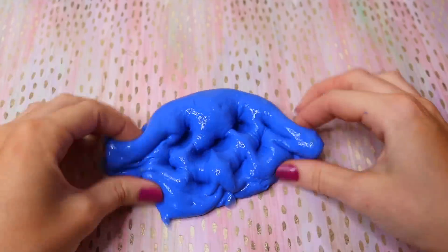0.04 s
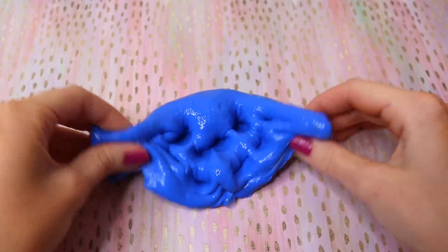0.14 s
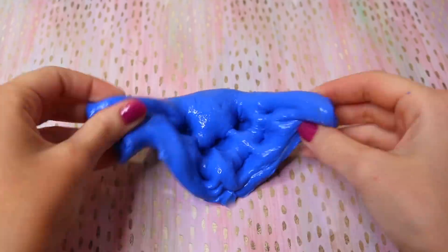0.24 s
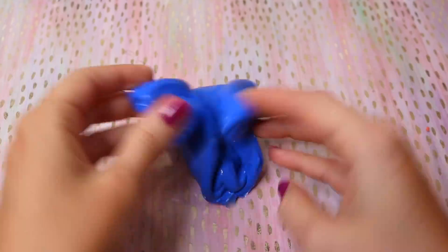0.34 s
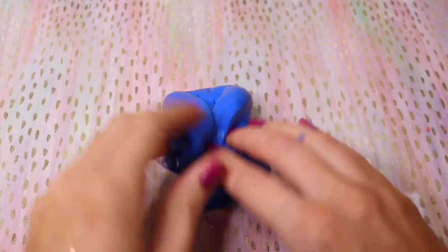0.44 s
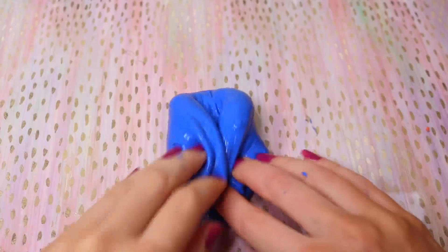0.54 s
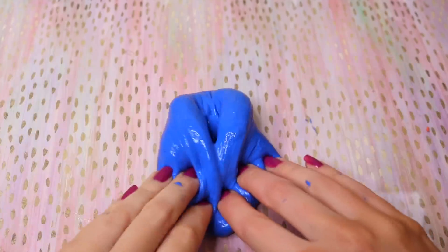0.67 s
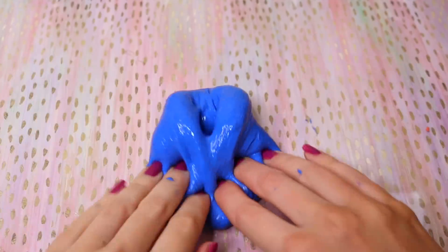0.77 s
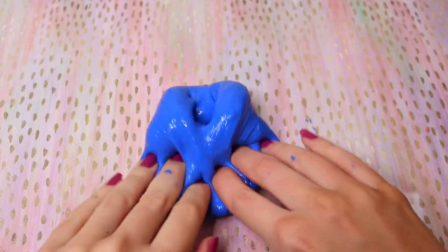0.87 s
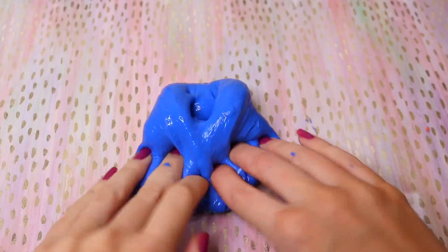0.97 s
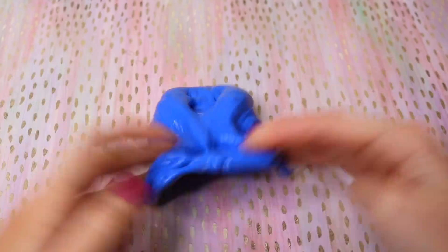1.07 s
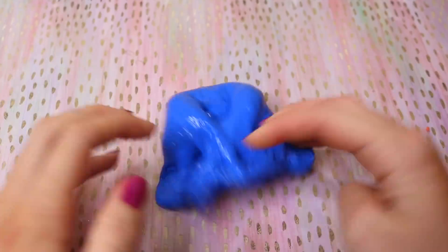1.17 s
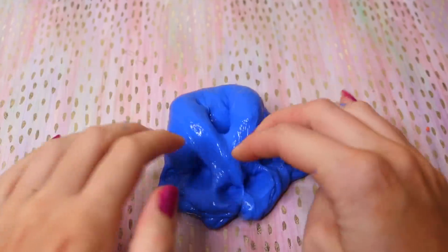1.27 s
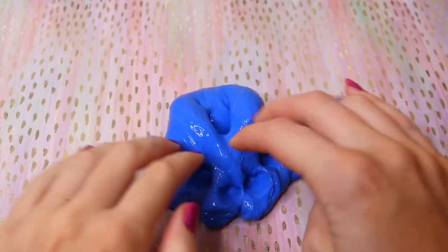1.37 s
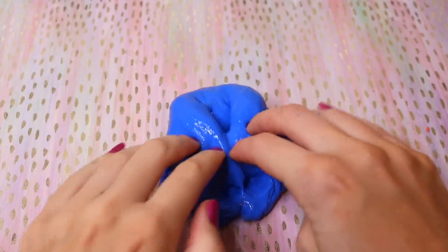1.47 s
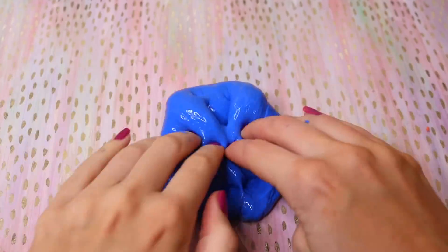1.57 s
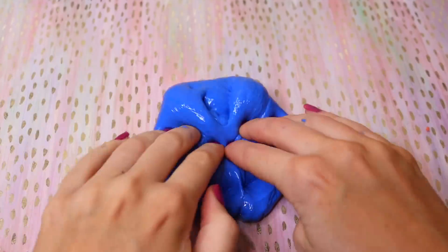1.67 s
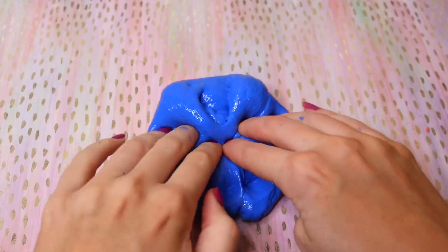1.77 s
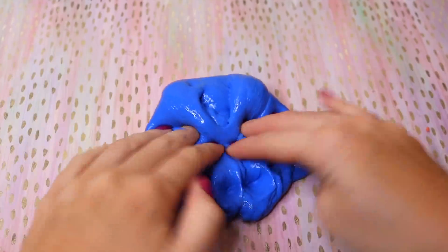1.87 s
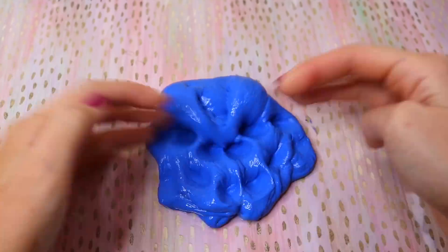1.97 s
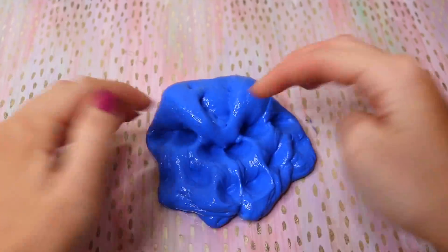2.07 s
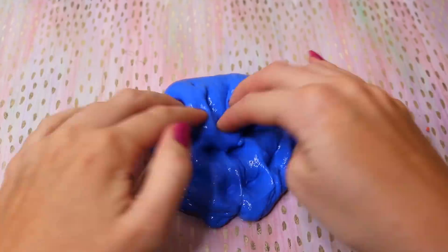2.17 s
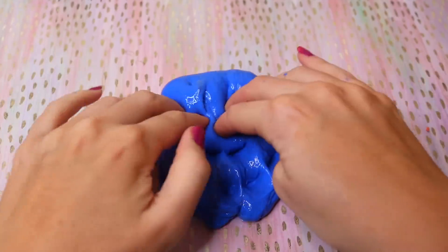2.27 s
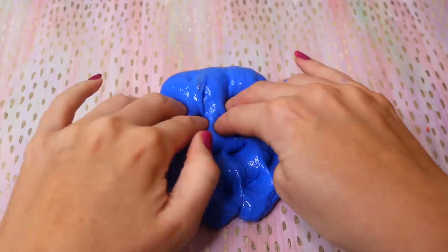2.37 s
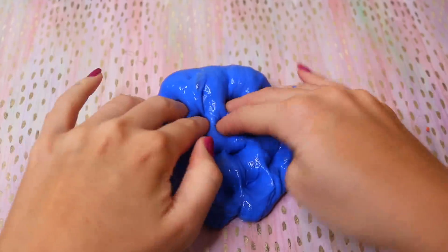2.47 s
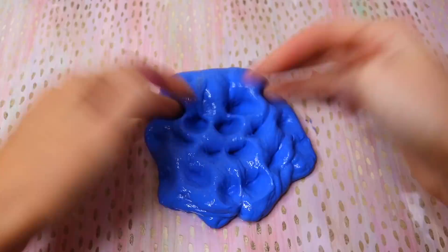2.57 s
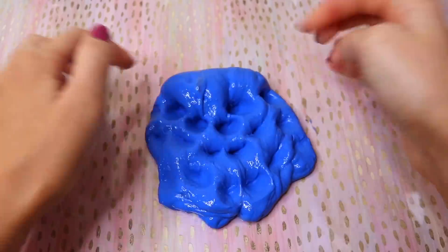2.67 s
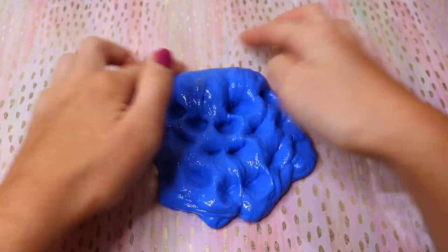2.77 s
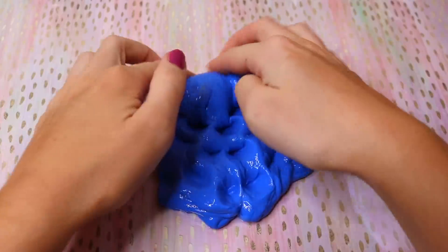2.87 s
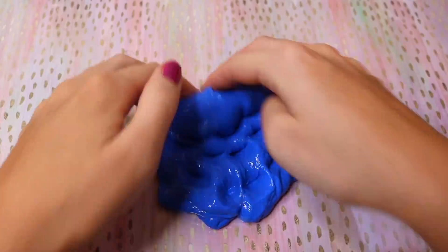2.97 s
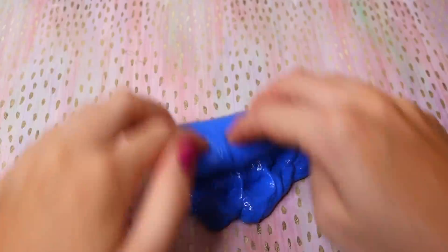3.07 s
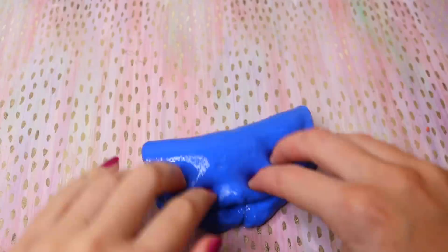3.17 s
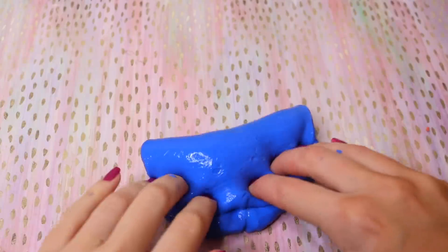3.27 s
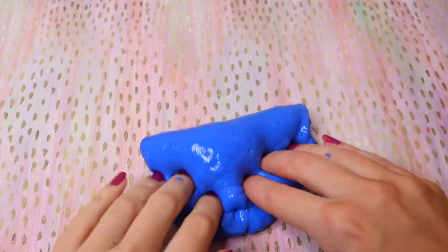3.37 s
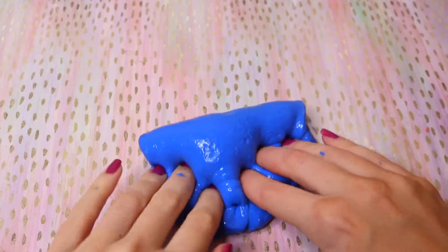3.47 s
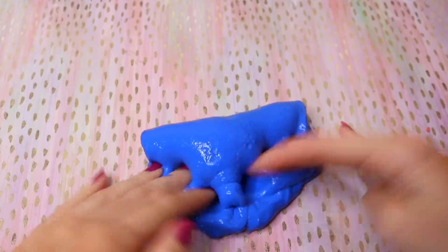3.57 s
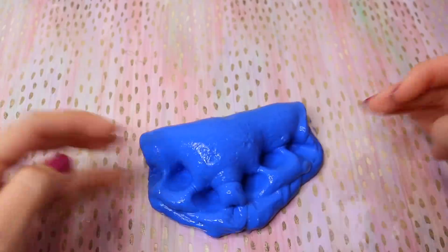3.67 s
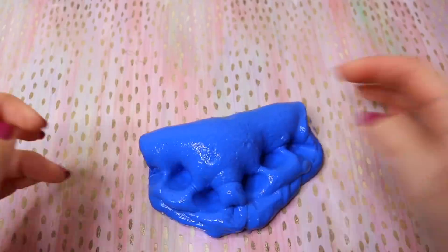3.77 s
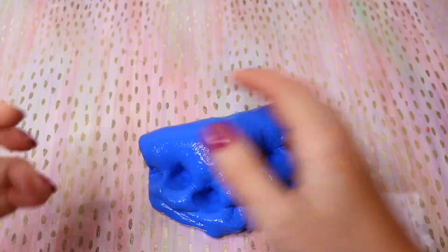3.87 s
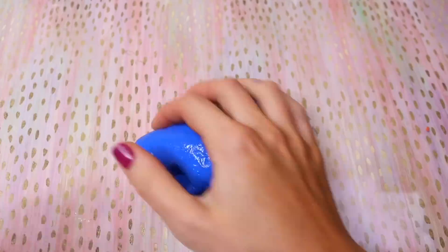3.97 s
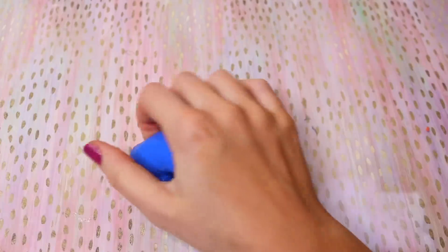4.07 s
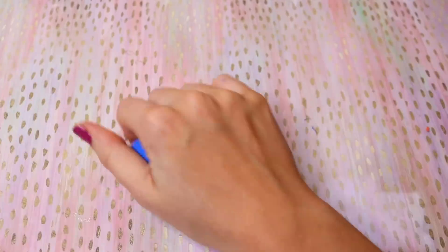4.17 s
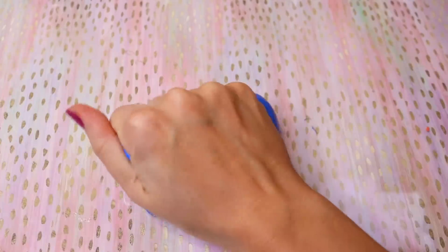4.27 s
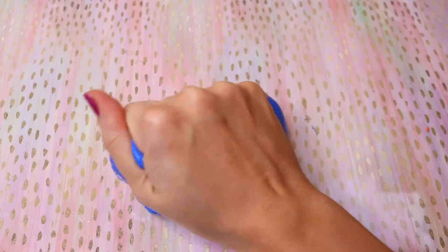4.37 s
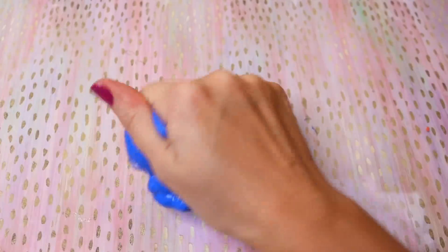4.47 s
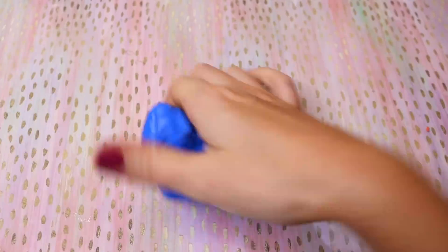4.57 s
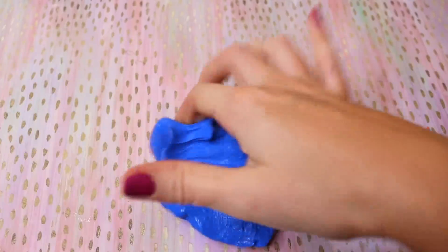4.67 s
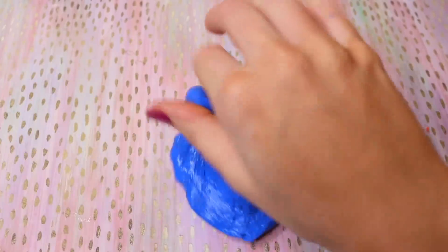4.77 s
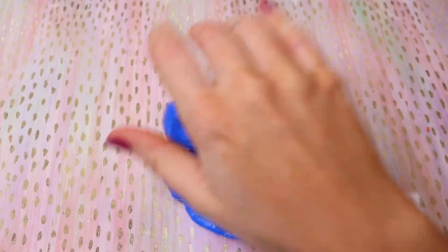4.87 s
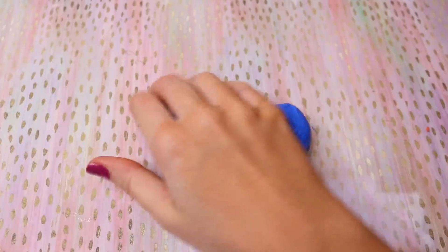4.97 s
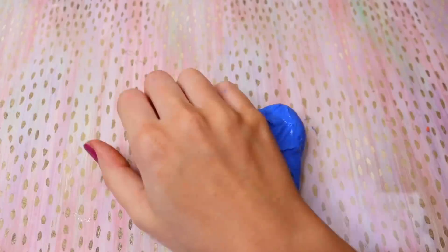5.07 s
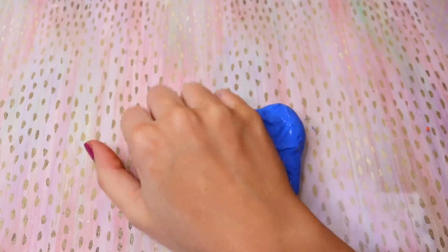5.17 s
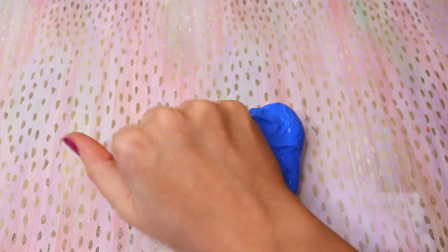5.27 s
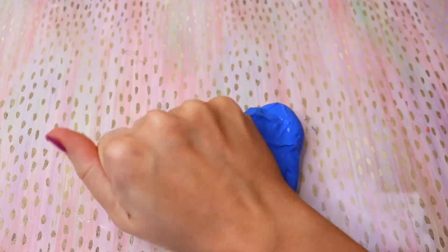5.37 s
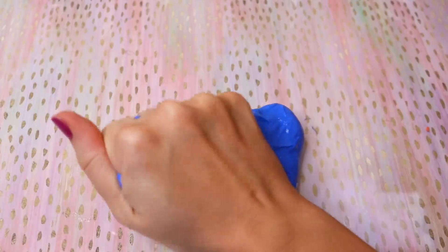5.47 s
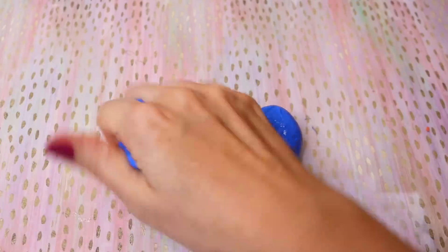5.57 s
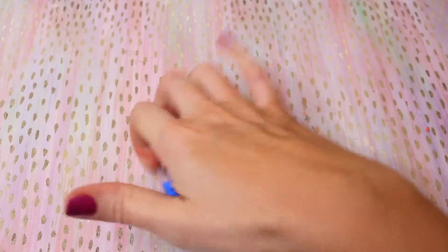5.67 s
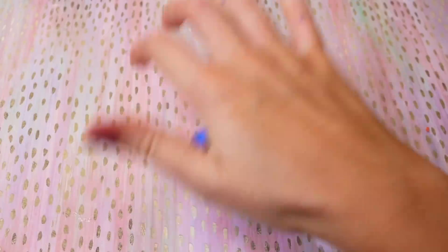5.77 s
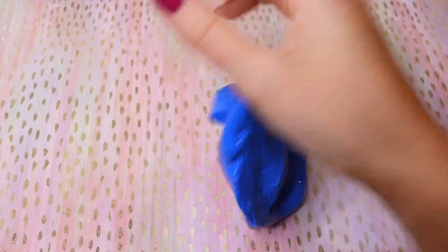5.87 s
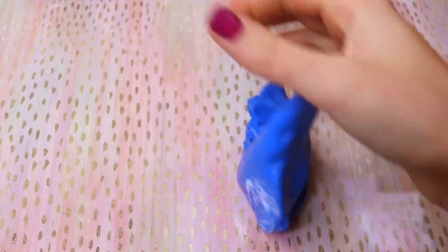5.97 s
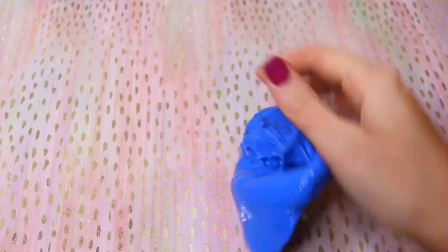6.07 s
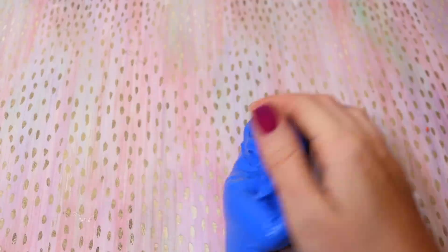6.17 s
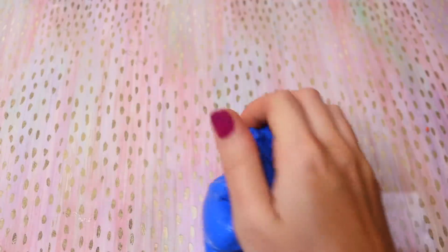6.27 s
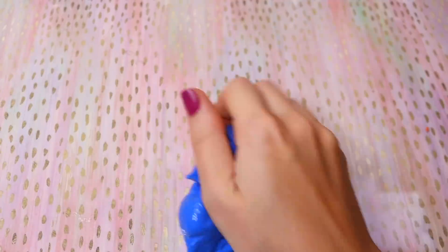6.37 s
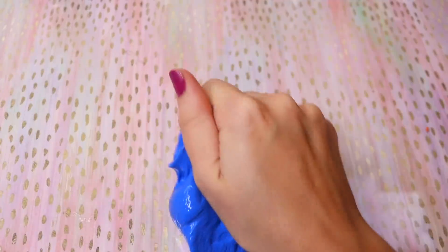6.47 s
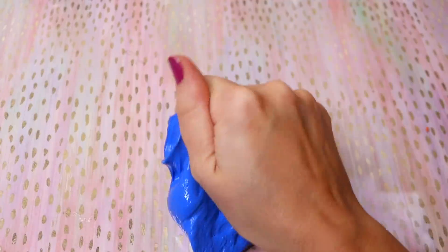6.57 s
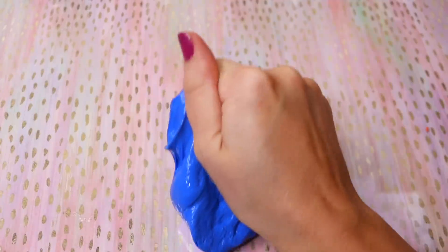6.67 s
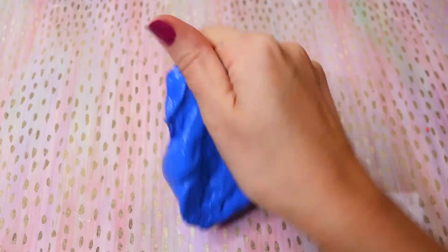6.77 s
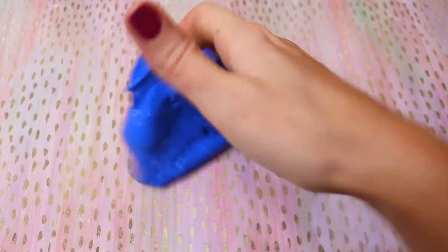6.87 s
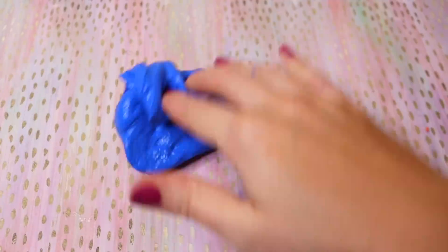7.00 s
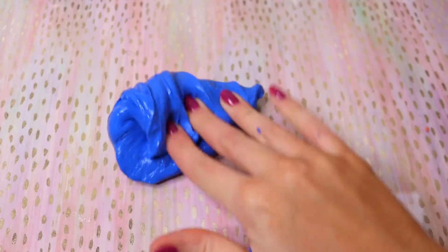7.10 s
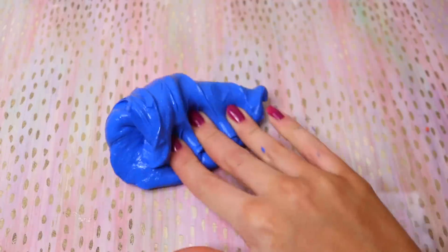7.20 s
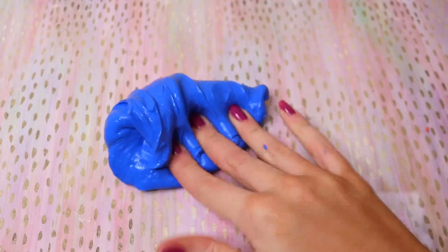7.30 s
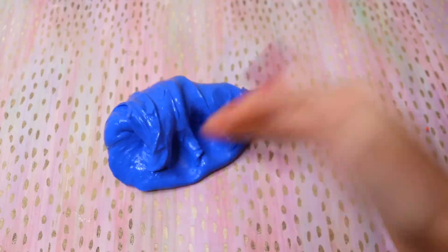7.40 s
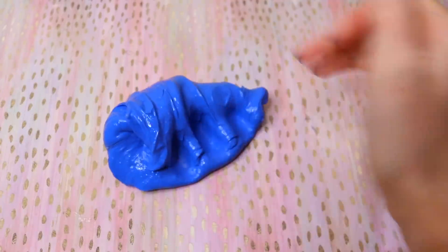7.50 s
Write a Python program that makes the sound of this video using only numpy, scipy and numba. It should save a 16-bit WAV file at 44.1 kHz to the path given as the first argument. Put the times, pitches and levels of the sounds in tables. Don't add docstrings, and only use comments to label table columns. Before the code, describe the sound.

Hands poke, fold and squeeze wet slime very close up, air pockets bursting in sharp irregular snaps with hollow plops and dull table knocks.

```python
import sys
import numpy as np
from scipy import signal
from scipy.fft import rfft, irfft
from scipy.io import wavfile
from scipy.ndimage import uniform_filter1d
from numba import njit

SR = 44100
rng = np.random.default_rng(int(sys.argv[2]) if len(sys.argv) > 2 else 0)


def materialize(psi):
    bounded = np.clip(np.atleast_2d(psi).T, -1, 1)
    quanta = np.round(bounded * 32767).astype(np.int16)
    wavfile.write(sys.argv[1], SR, quanta)


def voltage_ratio(level):
    return 10 ** (np.asarray(level, float) / 20)


N = 332514
t = np.arange(N) / SR


def band(x, hz, width_hz, order=1):
    edges_hz = np.clip([hz - width_hz / 2, hz + width_hz / 2], 15, .45 * SR)
    return signal.sosfilt(signal.butter(order, edges_hz, "band", fs=SR, output="sos"), x)


def peak(x, db):
    return x * voltage_ratio(db) / np.abs(x).max()


def unit(x):
    return x / np.sqrt(np.mean(x ** 2))


def add(out, start_s, x):
    i = int(start_s * SR)
    out[..., i:i + x.shape[-1]] += x[..., :N - i]


def decay(u, t60_s):
    return np.exp(-np.log(1000) * u / t60_s)


def walk(rate_hz):
    k = int(SR / rate_hz)
    steps = np.repeat(rng.standard_normal(N // k + 1), k)
    return 0.71 * uniform_filter1d(uniform_filter1d(steps, k), k)[:N]


@njit
def follow(x, attack, release):
    y, e = np.empty(len(x)), 0.
    for i in range(len(x)):
        e += (x[i] - e) * (attack if x[i] > e else release)
        y[i] = e
    return y


def hiss():
    # hz, density_db
    colour = [(15, -33), (25, -8), (70, -9), (123, -5), (141, -8), (175, -12), (242, -8.5), (734, -16.5),
              (1290, -17), (1700, -20.5), (3250, -25), (4870, -28.5), (9320, -25), (13600, -31),
              (16000, -36.5)]
    level_db = -53
    colour_hz, colour_db = np.transpose(colour)
    hz = np.fft.rfftfreq(N, 1 / SR) + 1
    shape = voltage_ratio(np.interp(np.log(hz), np.log(colour_hz), colour_db))
    mid, side = rfft(rng.standard_normal((2, N)))
    apart = np.clip(0.38 + hz / 1400, 0, 1)
    air = irfft(shape * (mid + apart * side * np.array([[1], [-1]])), N)
    return voltage_ratio(level_db + 0.27 * walk(2.6)) * unit(air)


def mains_hum():
    # hz, rms_db
    tones = [
        (60, -66),
        (115.82, -69.5),
        (120.09, -55.5),
        (240.2, -67),
    ]
    first_swell_s = 0.058
    hum = np.zeros(N)
    for hz, db in tones:
        level = voltage_ratio(db + 0.54 * walk(3.52)) * np.sqrt(2)
        hum += level * np.sin(2 * np.pi * hz * (t - first_swell_s))
    return hum


def pull(peak_s, swell_ms, fade_ms, db):
    before = (peak_s - t) * 1000 / max(swell_ms, 3)
    after = (t - peak_s) * 1000 / max(fade_ms, 3)
    return voltage_ratio(db - 10 * np.maximum(before, after) ** 2.15)


def peel():
    # peak_s, swell_ms (10 dB), fade_ms (10 dB), level_db, treble_db
    peels = [(0, 50, 75, -52, -8), (.12, 6, 63, -53, -9), (1.151, 59, 25, -45.5, -2.5),
             (2.87, 40, 174, -53.5, -8), (4.04, 73, 108, -53, -0.5), (4.3, 100, 30, -50, -7),
             (4.597, 50, 85, -39.5, -8), (5.1, 60, 8, -52, -13), (5.647, 66, 123, -46.5, -4.5),
             (6.862, 25, 25, -40, -0.5), (6.93, 36, 72, -52.5, 2), (7.457, 34, 12, -45.5, -6),
             (7.487, 5, 6, -48, -8)]
    sizes = voltage_ratio(1.8 * rng.exponential(size=N) + 6 * walk(200))
    grains = rng.standard_normal((3, N)) * sizes
    grains = grains[0] + 0.63 * grains[1:]
    dull, bright = np.zeros(N), np.zeros(N)
    for peak_s, swell_ms, fade_ms, db, treble_db in peels:
        tear = pull(peak_s, swell_ms, fade_ms, db)
        dull += tear
        bright += tear * voltage_ratio(treble_db)
    hollow = 0.88 * band(grains, 840, 200) + band(grains, 1540, 880) + 0.29 * band(grains, 3200, 1260)
    return dull * unit(hollow) + bright * unit(band(grains, 7130, 5300))


def leaks():
    # peak_s, swell_ms (10 dB), fade_ms (10 dB), level_db, slit_hz
    slits = [(.005, 10, 35, -53, 4530), (.11, 40, 48, -54, 1640), (5.106, 10, 14, -51, 7960),
             (5.525, 8, 128, -33.5, 9200), (6.662, 23, 40, -42, 870), (6.668, 22, 35, -43, 1450),
             (7.452, 22, 16, -50, 7500), (5.82, 40, 50, -60, 3200), (1.14, 25, 25, -50, 1250),
             (3.7, 30, 55, -47.5, 950), (6.655, 15, 40, -44, 4100), (2.92, 40, 60, -56, 1750),
             (3.79, 50, 60, -56, 650), (5.645, 40, 40, -52, 2000)]
    air = rng.standard_normal((3, N))
    air = (air[0] + 0.64 * air[1:]) * voltage_ratio(4.4 * walk(120))
    return sum(pull(*row) * unit(band(air, hz, 0.47 * hz, order=2)) for *row, hz in slits)


def table_top():
    # hz, level_db, t60_s
    modes = [
        (243, -7, .17),
        (278, -3, .2),
        (260, -5, .19),
        (391, -7, .11),
        (428, -10, .08),
        (540, -11, .12),
    ]
    # start_s, level_db, low_modes_db
    pushes = [(.052, -44.5, 7), (1.081, -33.5, 2), (1.14, -50, 2), (1.284, -31.5, 3.5), (1.955, -22.5, -5),
              (1.9845, -14.5, -6), (2.009, -31, -8), (2.03, -31, -8), (2.591, -17, -3), (2.617, -28, 4),
              (2.651, -21, 5), (2.873, -29.5, 5), (3.152, -46, 4), (3.351, -41, 1), (3.617, -29.5, -1.5),
              (3.647, -30, -1.5), (3.681, -26.5, -5), (4.07, -38.5, 7), (4.234, -33.5, 1),
              (4.298, -32, -1.5), (4.684, -36.5, -3), (5.047, -31.5, 6), (5.101, -50, -3), (5.155, -29, -1),
              (5.255, -26, 8), (6.178, -43.5, 7), (6.453, -35, 5.5), (7.423, -36.5, -4), (7.445, -33, 1),
              (1.974, -25, -10),
        (2.641, -25, 5),
        (4.227, -40, 0),
        (3.75, -44, -6),
    ]
    damped = .95
    hard_ms, softer_ms_per_db = 0.68, 0.07
    out, u = np.zeros(N), t[:14000]
    for start_s, level_db, low_db in pushes:
        ring = np.zeros(len(u))
        for hz, db, t60_s in modes:
            place_db = 2.1 * rng.standard_normal()
            gain = voltage_ratio(db + place_db + low_db * (hz < 300))
            ring += gain * np.sin(2 * np.pi * hz * u) * decay(u, t60_s * damped)
        blur = band(rng.standard_normal(len(u)), 450, 440, order=2)
        knock = .6 * unit(blur) * decay(u, .12)
        push_ms = max(hard_ms - softer_ms_per_db * level_db, .3)
        push = np.hanning(int(push_ms * SR / 1000) - 2)
        thump = band(signal.fftconvolve(ring + knock, push), 804, 927, order=2)
        add(out, start_s, peak(thump, level_db))
    return out


def film_rows():
    # start_s, level_db, low_treble_db, pan_db (left minus right), spatter_ms
    large = [(1.9568, 4, -6.5, -5.5, 0.61), (2.589, 3, -38, -3, 0.21), (2.5921, -11.5, 9.5, -3, 0.52),
             (2.6133, 7.5, -48, -2.5, 0.79), (3.154, -15, 3, -4, 1.1), (3.6195, 6.5, -14.5, -6, 0.93),
             (3.6452, -2.5, -30.5, 9, .67), (3.6475, 0.5, -9, -19.5, 0.94), (3.677, -4, -17, -2, 1.8),
             (4.2518, 0.5, -15, -2, 1.15), (4.3119, -4.5, -7, -4, 1.5), (4.3374, -3.5, -15, 3.5, 2.2),
             (4.357, -3, -33.5, -16.5, 0.62), (4.4367, 4.5, -13, -2.5, 1.1), (4.5674, -17, -14, -3, 2.5),
             (4.6079, -13, -8, -5.5, 1.2), (5.3524, -5, -8, -1.5, .9), (5.4535, -1, -8, -1, 0.68),
             (5.5122, 3, -16, -0.5, 2.2), (5.5194, -7, -43, -2, 2.7), (6.5853, -5, -15, -3, 1.4),
             (6.594, -0.5, -8, 0, 0.81), (6.6311, 6, -4, -4.5, 1.8), (6.6972, 4.5, -7, -2, 2.44)]
    # start_s, level_db, low_treble_db, pan_db
    trailers = [(1.9775, -27, 23.5, -7), (1.98, -24, 18.5, 3), (1.986, -27, 16, -3.5),
                (2.019, -17.5, -21, 8.5), (2.0236, -23, -13, -19.5), (2.0357, -40, 22, 1),
                (2.0445, -20, -9, -5), (2.6589, -15, -28, 9.5), (2.6642, -13, -37.5, -13),
                (2.6888, -19, -8, -5), (3.1859, -27.5, 2, -8.5), (3.192, -23, -31, -2.5),
                (3.6309, -18.5, -18, 6.5), (3.6812, -16, -10, 3), (4.26, -14, -17, -5),
                (4.2792, -24, -3, 5), (4.3446, -16, -21, 5.5), (4.4024, -24, -15, 8.5),
                (4.4084, -14, -14, -4), (4.4212, -16, -25, 0), (4.4423, -11.5, -23, 5),
                (4.4516, -21, -20, 2), (4.5905, -29, 0, -3), (4.682, -25, -10, -3), (5.3857, -23.5, -6, -2),
                (5.4605, -17, -20, 0), (5.5266, -16, -40, 11), (6.6185, -21, -5, -1.5),
                (6.6444, -5, -15, -3), (6.7664, -16, -12, -1)]
    # start_s, level_db, low_treble_db, pan_db
    ticks = [(.1578, -33, -22, 1), (.2592, -36, -5, -2), (.3063, -37, -22, -5), (.3578, -30.5, -12, -5),
             (.3808, -33, 16, -5.5), (.434, -23.5, -2, -4.5), (.5543, -31.5, -5, -6),
             (.6603, -34.5, -8, -2), (.848, -22, -15, -14), (1.0787, -26, -30, -3), (1.0908, -28.5, -4, -9),
             (1.1517, -27, -3, -6), (1.168, -23, -7.5, -6), (1.2724, -35.5, 3, -16),
             (1.285, -37, 14.5, -13), (1.5976, -28.5, -11, -5), (1.6343, -16.5, -31.5, -11),
             (2.366, -37, -2.5, -3), (3.3498, -14, -9.5, -11), (3.5636, -31.5, -12, 1),
             (3.9844, -34.5, -10, -12), (4.0357, -29.5, -7.5, -13), (4.2077, -30, 10, -3),
             (4.2313, -32, 4.5, -10), (5.0491, -28, -22, -1), (5.158, -20.5, -13, -2),
             (6.2518, -32, -4.5, -26), (6.5005, -25, -9, -4), (6.5355, -22.5, -11, -2),
             (6.8651, -21, 0.5, -3)]
    # start_s, level_db
    specks = [(.1274, -38), (.5745, -37), (0.722, -39), (1.183, -32), (1.968, -22), (2.3602, -38.5),
              (2.6269, -17), (3.6571, -31), (3.6917, -24), (4.236, -27.5), (4.2645, -25), (4.2959, -32),
              (4.361, -20.5), (4.7723, -33), (5.101, -31), (5.895, -37), (5.912, -37.5), (6.3703, -36.5),
              (6.428, -30), (6.8566, -22), (6.929, -29), (6.974, -31), (7.189, -33), (7.4605, -28)]
    # start_s, level_db, low_treble_db, pan_db
    crackles = [(1.731, -39, -4, -3), (2.0095, -27, -20, -3), (2.056, -28, -20, -3), (3.2235, -45, 6.5, -3),
                (3.6832, -15, -14, -6), (4.2535, -11, -12, -2), (4.4385, -11, -17, -2), (4.556, -36, 0, -3),
                (4.7, -34, -1, -3), (4.827, -40, 3, -3), (4.846, -41.5, 6, -3), (5.0693, -37, -3, -2),
                (5.1045, -32, -8, -5), (5.128, -35, -12, -2), (5.18, -36, -15, -2), (5.3505, -14, -3, 0),
                (5.433, -49, 12, -2), (6.629, -20, -5, -3), (6.6337, 2, -8, -8), (6.683, -16, -15, -3),
                (6.6993, -7, -5, -8), (6.709, -22, -6, -3), (6.7645, -24, -3, -4), (7.456, -33, -2, -3.5),
                (7.486, -43, 5, -9), (6.876, -29, -5, -3), (6.915, -33, -3, -3), (7.4605, -33, -2, -5),
                (7.444, -40, 5, -2), (5.5135, -6, -10, -2.5), (6.647, -17, -11, -3)]
    # start_s, ring_hz
    own_rings = [(1.6343, 8540), (2.0236, 8000), (2.6642, 7340), (3.154, 7400), (3.3498, 8300),
                 (3.677, 7200), (4.2077, 6500), (4.3374, 12200), (4.357, 11200), (4.5664, 7800),
                 (4.6079, 7550), (5.0491, 6700), (5.158, 7000), (5.5122, 9760), (5.5194, 9600),
                 (6.2518, 10500), (1.9568, 9000), (1.0787, 6800), (6.6311, 8500), (6.6444, 8300),
                 (6.7664, 11500), (6.8651, 7000)]
    trailer_ms, tick_ms = 1.67, 1.3
    base_hz, deep_from_db, sag_hz_per_db, sag_hz_per_ms = 8910, -9.5, 118, 1500
    palm_from_s, palm_hz = 4.22, 998

    specks = [(start_s, db, -6.5, -4.5) for start_s, db in specks]
    rows = list(large)
    for group, ms in [(trailers, trailer_ms), (ticks + specks, tick_ms), (crackles, tick_ms)]:
        for row in group:
            rows.append((*row, ms * voltage_ratio(-max(row[2], 0))))

    rings_hz = []
    for start_s, db, low_db, pan_db, ms in rows:
        hz = base_hz - sag_hz_per_db * max(low_db - deep_from_db, 0) - sag_hz_per_ms * max(ms - 2, 0)
        rings_hz.append(max(hz + palm_hz * (start_s > palm_from_s), 4000))
    for start_s, hz in own_rings:
        rings_hz[np.argmin([abs(row[0] - start_s) for row in rows])] = hz
    return [(start_s, db, hz, *rest) for (start_s, db, *rest), hz in zip(rows, rings_hz)]


def snaps():
    out, u = np.zeros((3, N)), t[:2400]
    for start_s, db, hz, low_db, pan_db, spatter_ms in film_rows():
        shared, left, right, size = rng.standard_normal((4, len(u)))
        spatter = .8 * (shared + np.array([left, right, 0 * u])) * voltage_ratio(4 * size)
        droplets = .165 * np.exp(-u * 1000 / max(spatter_ms, .2))
        fizz = .014 * np.exp(-u / .011)
        burst = spatter * (droplets + fizz) * [[1], [1], [0]]
        burst[:, 0] = [1, 1, 1 + 0.76 * spatter_ms]
        ring = band(burst, hz, 0.63 * hz, order=2)
        body = band(burst, 3600, 2500, order=2)
        edge = .3 * band(burst, 13500, 5000, order=2)
        snap = ring / np.abs(ring[:2]).max() + voltage_ratio(low_db) * body / np.abs(body[:2]).max() + edge
        snap[0] = np.roll(snap[0], int(1.6 * abs(size[0])))
        add(out, start_s, snap * voltage_ratio(db + np.array([[pan_db], [-pan_db], [0]]) / 2))
    return out


def hollows(rows, cycles, rough=.4, swell_cycles=.01):
    out, u = np.zeros((2, N)), t[:2600]
    for start_s, db, hz in rows:
        fade = decay(u, cycles / hz)
        swell = 1 - np.exp(-u * hz / swell_cycles)
        tone = np.sin(2 * np.pi * hz * (u + 3.3 * u ** 2)) * fade * swell
        noise = rng.standard_normal(len(u))
        wet = np.array([noise, .6 * noise + .8 * noise[::-1]])
        wet = unit(band(wet, .9 * hz, .8 * hz)) * fade ** .4
        add(out, start_s, peak(tone + rough * wet, db))
    return out * voltage_ratio(np.array([[-1.5], [1.5]]))


def plops():
    # start_s, level_db, hollow_hz
    holes = [(0.379, -36, 1490), (.811, -35, 2180), (.433, -36, 1490), (1.078, -36, 766),
             (1.118, -35, 1160), (1.126, -30, 1320), (1.142, -28, 1190), (1.169, -38.5, 1130),
             (1.271, -30, 1510), (1.285, -14.5, 1340), (1.957, -9, 1400), (1.972, -18, 1490),
             (2.589, -4, 1325), (2.614, -13.5, 960), (2.646, -22.5, 1290), (2.6642, -15, 1300),
             (2.875, -32, 1210), (3.154, -19, 1620), (3.349, -27, 1170), (3.62, -9.5, 820),
             (3.6487, -10, 880), (3.703, -26, 800), (5.046, -22.5, 1600), (5.158, -24, 696),
             (7.42, -33.5, 1396), (7.459, -31, 840), (7.485, -31.5, 860)]
    return hollows(holes, cycles=21)


def gulps():
    # start_s, level_db, hollow_hz
    cavities = [(3.62, -15, 453), (3.6775, -21, 744), (4.608, -32, 810), (5.403, -40, 1320),
                (6.632, -14.5, 790), (6.6315, -20.5, 470), (6.697, -26, 805), (6.832, -33.5, 1300),
                (7.462, -33, 700), (3.154, -29, 760), (3.186, -33.5, 800), (3.6194, -17, 1100),
                (5.047, -30, 600), (7.4235, -36, 1400), (2.59, -15, 1550), (4.621, -30, 1500),
                (3.677, -23, 1250), (4.297, -24, 600), (2.0155, -24, 1400), (2.036, -27, 1350),
                (2.05, -30, 1100), (1.135, -33, 1250), (.554, -42, 1800), (.722, -43, 2000),
                (5.473, -33, 1500)]
    return hollows(cavities, cycles=13)


def pings():
    # start_s, level_db, pitch_hz
    bubbles = [(4.567, -7, 7900), (4.5682, -8, 7100), (4.6083, -17, 3800), (4.609, -20, 5600),
               (4.621, -27, 2300), (4.567, -24, 2950), (4.2516, -12, 2800), (4.279, -26, 2700),
               (4.2955, -25, 2900), (4.356, -22, 2000), (4.3122, -14, 3500), (5.3504, -21, 3050),
               (5.5122, -14, 4300), (5.4532, -18, 4300), (6.6315, -9, 4100), (6.6985, -14, 4200),
               (6.709, -28, 6500), (5.5205, -18, 9300), (4.59, -27, 2100), (4.596, -30, 2900),
               (4.583, -30, 3400), (4.639, -32, 3300), (3.646, -15, 2300), (1.6343, -22, 8000),
               (3.6193, -8, 12000), (3.6193, -14, 4400), (2.874, -36, 1800)]
    return hollows(bubbles, cycles=34, rough=.22, swell_cycles=1.5)


def blips():
    # start_s, level_db, pitch_hz
    folds = [(4.556, -33, 860), (4.565, -34, 850), (4.577, -33, 820), (4.588, -33, 1350),
             (4.596, -35, 1100), (4.613, -30, 830), (4.639, -36, 1890), (4.703, -40, 1000), (5.6, -40, 890),
             (5.613, -38, 800), (5.614, -39, 1880), (5.628, -38, 820), (5.643, -38, 840),
             (5.644, -39, 1440), (5.698, -41, 2080), (6.641, -27, 1000), (6.647, -28, 1400),
             (6.655, -29, 900), (6.664, -29, 1500), (6.671, -30, 1000), (6.681, -32, 1200),
             (6.688, -33, 1450), (2.6, -19, 1280), (2.601, -21, 1650), (2.616, -16, 1300),
             (2.591, -12, 520), (1.963, -22, 1350), (1.986, -18, 410), (2.013, -31, 420), (2.03, -31, 410),
             (3.63, -24, 800), (3.66, -24, 900)]
    return hollows(folds, cycles=16)


def squelches():
    # start_s, level_db, hollow_hz
    pockets = [(4.251, -26, 2010), (4.28, -26, 1200), (4.293, -13.5, 1040), (4.312, -21.5, 1290),
               (4.356, -17, 1400), (4.436, -19.5, 1650), (4.622, -31, 870), (4.679, -29, 1330),
               (5.35, -30, 1970), (5.453, -21.5, 1650), (6.252, -29.5, 1530), (6.37, -36, 1290),
               (6.584, -24, 1520), (6.594, -18.5, 1460), (6.631, -4.5, 1306), (6.698, -16.5, 1490),
               (6.865, -29, 1170)]
    return hollows(pockets, cycles=17.3)


def room():
    # hz, t60_s, level_db
    ranges = [
        (322, 0.36, -18),
        (900, 0.51, -25),
        (2310, 0.27, -25),
        (5130, 0.57, -38),
        (9000, 0.29, -25),
        (12800, 0.46, -33.5),
    ]
    u, tail = t[:22000], 0
    for hz, t60_s, db in ranges:
        width_hz = min(1.09 * hz, 2 * (hz - 220))
        mid, side = band(rng.standard_normal((2, len(u))), hz, width_hz, order=2)
        pair = mid + min(hz / 1000, 1) * side * np.array([[1], [-1]])
        tail = tail + voltage_ratio(db) * pair * decay(u, t60_s)
    clumps = voltage_ratio(3.5 * walk(300)[:len(u)])
    onset = np.clip((u - .003) / 0.0023, 0, 1)
    return 0.11 * clumps * tail * onset


def scene():
    quiet = hiss() + mains_hum()
    wet = peel() + leaks() + plops() + gulps() + pings() + blips() + squelches()
    wood = table_top()
    bursts = snaps()
    to_walls = bursts[2] + wet.mean(axis=0) + wood
    echoes = signal.fftconvolve(to_walls[None], room(), axes=1)[:, :N]
    return bursts[:2] + wet + wood + echoes + quiet


def roll_off(x):
    return signal.sosfilt(signal.butter(12, 16780, fs=SR, output="sos"), x)


def record(dry):
    # start_s, level_db, length_ms, direction
    overloads = [
        (5.5118, -15.5, 0.55, -1),
        (6.6314, -24, 0.78, 1),
    ]
    attack_s, release_s = .004, .45
    loud = follow(np.abs(dry).max(axis=0), 1 / (attack_s * SR), 1 / (release_s * SR))
    heard = dry * (1 + loud / voltage_ratio(-22)) ** -.25
    top_hz = 15650
    heard = signal.sosfilt(signal.ellip(8, .3, 60, top_hz, fs=SR, output="sos"), heard)
    for start_s, db, length_ms, way in overloads:
        add(heard, start_s, way * voltage_ratio(db) * np.hanning(int(length_ms * SR / 1000) + 2))
    return roll_off(np.clip(heard, -1, 1))


dry = scene()
out = record(dry)
materialize(out)
```